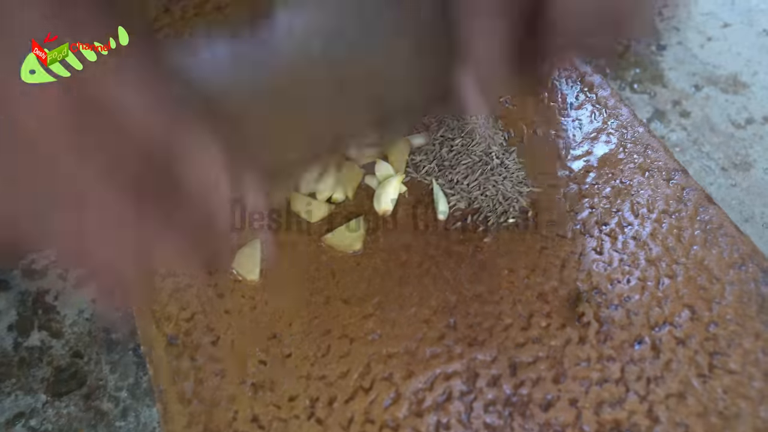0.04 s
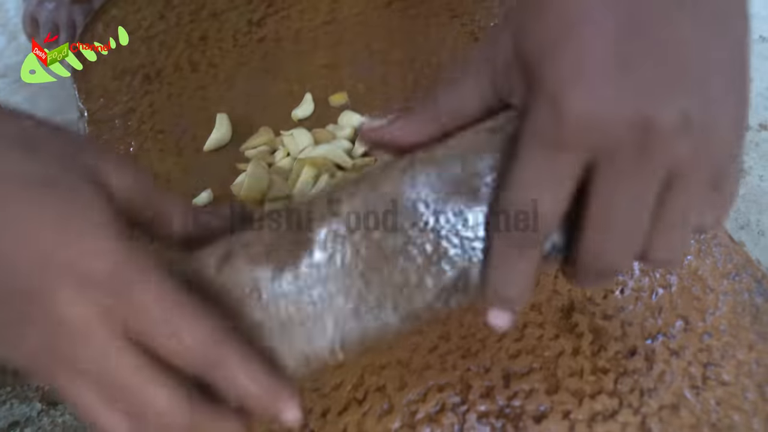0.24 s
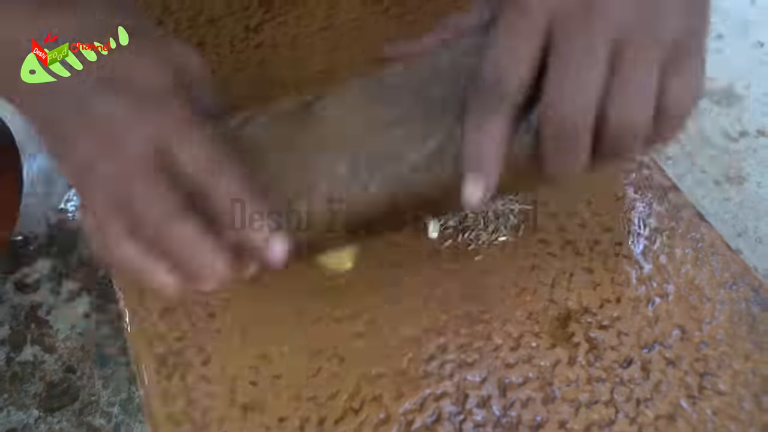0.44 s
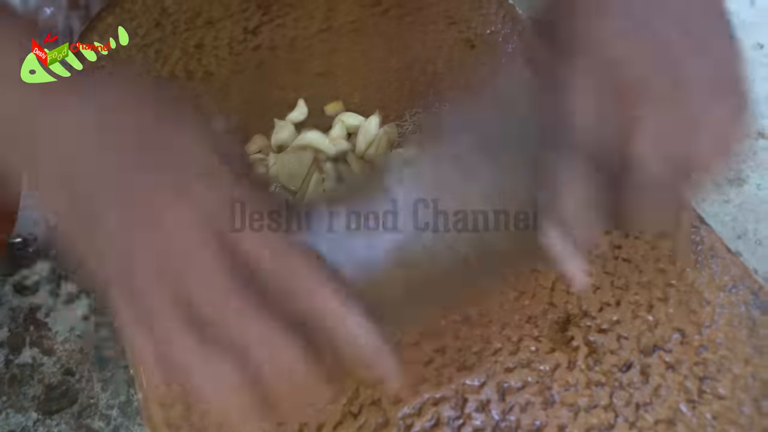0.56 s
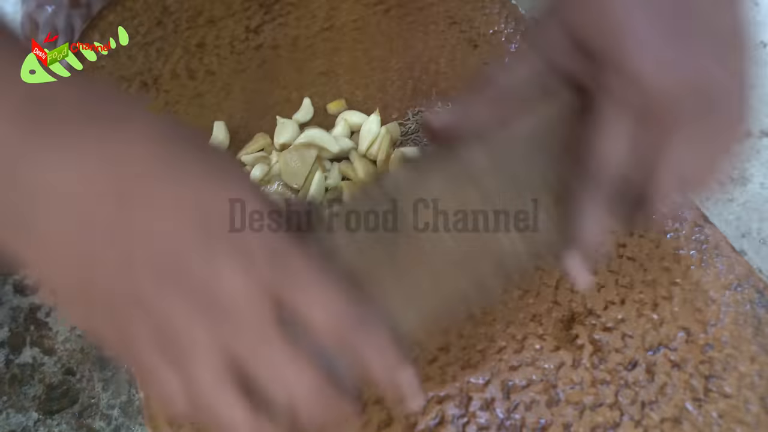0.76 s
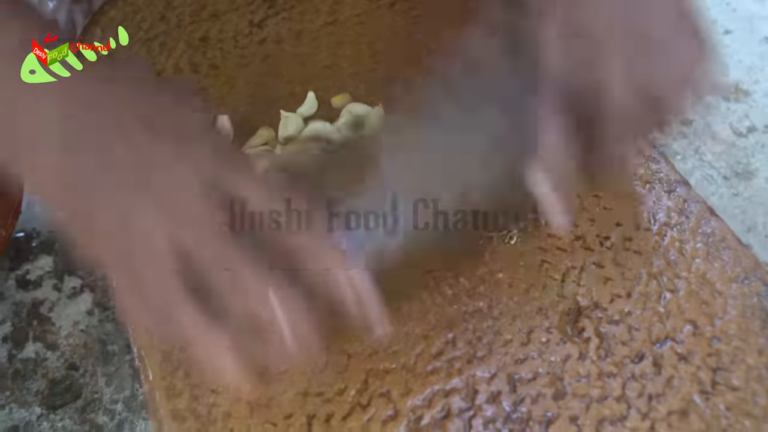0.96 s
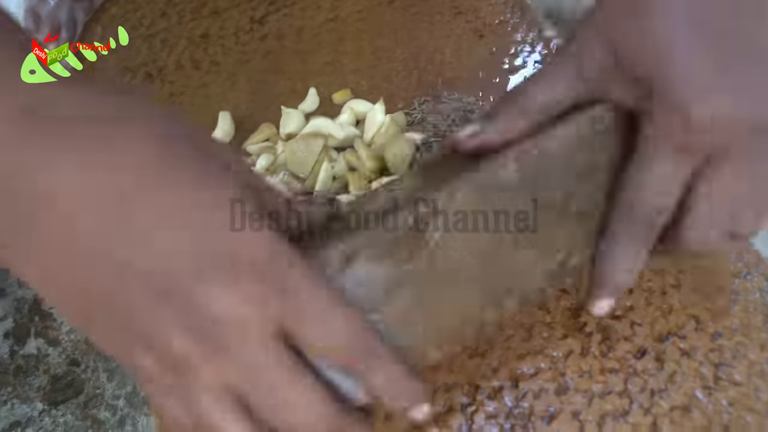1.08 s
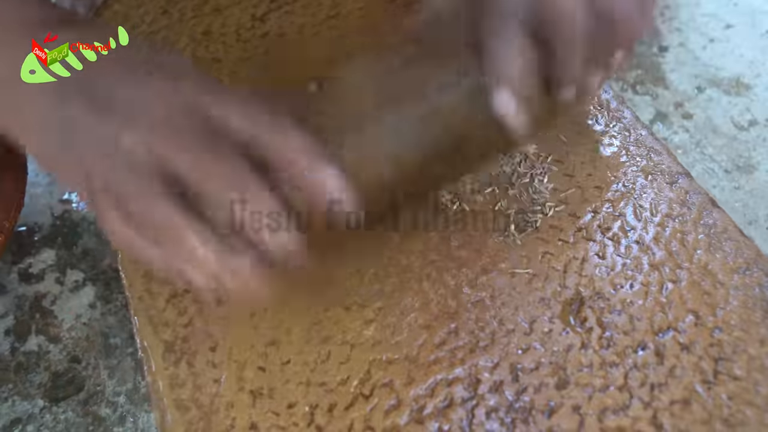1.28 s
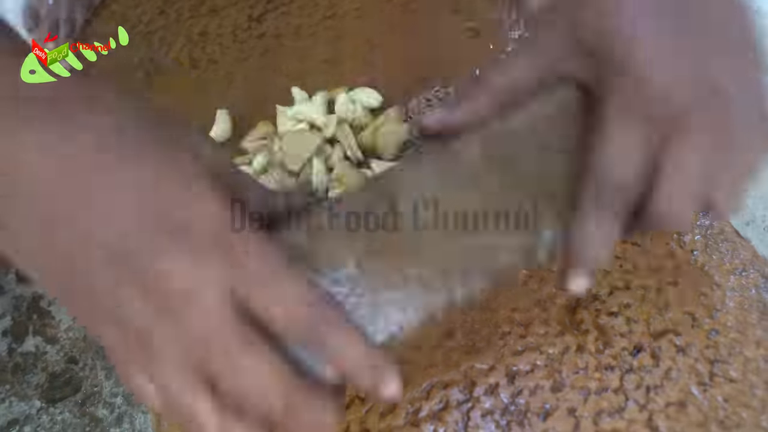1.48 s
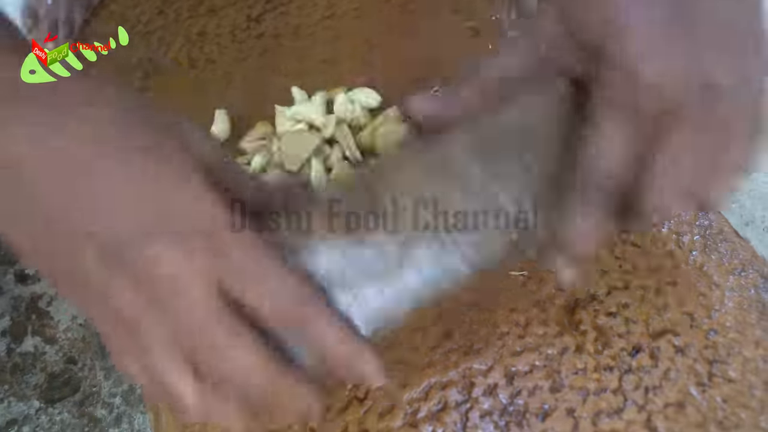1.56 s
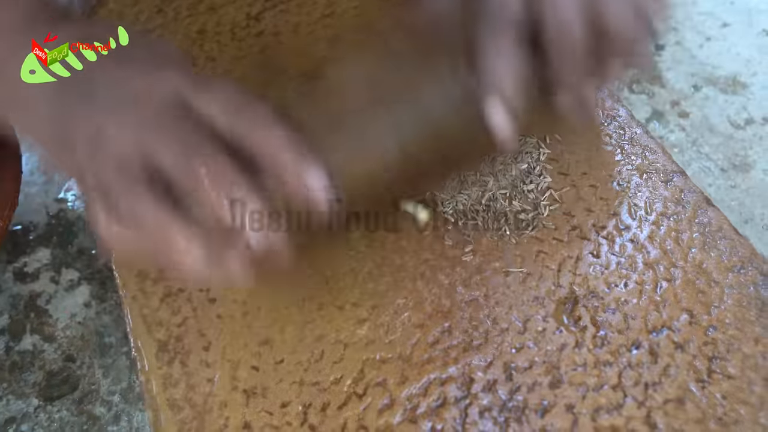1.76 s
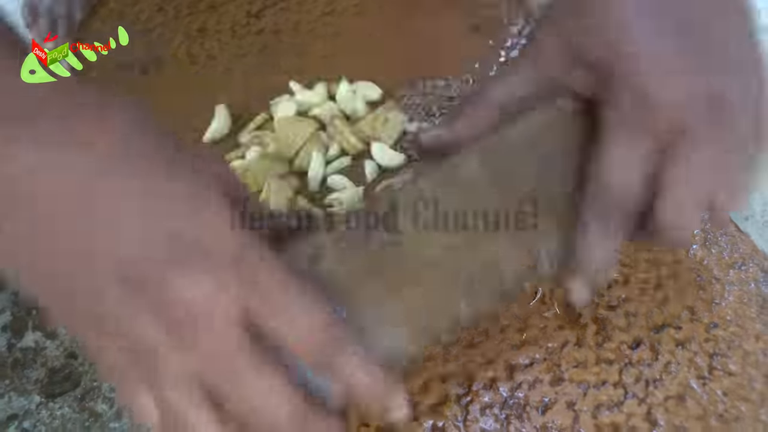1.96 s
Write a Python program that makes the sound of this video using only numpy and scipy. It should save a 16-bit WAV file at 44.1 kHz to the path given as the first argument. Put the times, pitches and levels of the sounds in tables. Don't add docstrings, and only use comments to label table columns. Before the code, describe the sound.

Stone grinding on stone: hard knocks, gritty rattles and crunching seeds in a quiet kitchen

```python
import sys
import numpy as np
from scipy import signal
from scipy.io import wavfile
from scipy.ndimage import uniform_filter1d

SR = 44100
rng = np.random.default_rng(int(sys.argv[2]) if len(sys.argv) > 2 else 0)


def store_wav(level_fs):
    pcm = np.round(np.clip(np.atleast_2d(level_fs), -1, 1) * 32767)
    wavfile.write(sys.argv[1], SR, pcm.T.astype(np.int16))


def voltage_ratio(decibels):
    exponent = np.asarray(decibels, float) / 20
    return 10 ** exponent


N = 89082

# pitch in Hz, level in dB, time to fall 60 dB in seconds,
# share that differs between left and right (0 to 1).
ROLLER_MODES = [(753, -5.5, 0.11, 0.062), (1059, 2, 0.044, 0.54), (1155.3, 3, 0.073, 0.6),
                (1345, 0.5, 0.04, 0.53), (1540, 0.5, 0.028, 0.46), (1780, -3.5, 0.021, 0.39),
                (2126, -11.5, 0.014, 0.32), (2742, -17.5, 0.046, 0.46), (4210, -24, 0.034, 0.36),
                (5910, -29, 0.016, .4)]
# pitch in Hz, level in dB, time to fall 60 dB in seconds.
THUD_MODES = [(81, -2, 0.116), (123.2, 8.5, 0.13), (186.2, 10.5, 0.099), (292, 21, 0.024)]
# pitch in Hz, level in dB, time to fall 60 dB in seconds,
# share that differs between left and right (0 to 1).
BENDING_MODES = [(341.4, -11, 0.056, 0.28), (464, -10, 0.037, 0.032), (542, -14, 0.01, 0.44),
                 (684.2, 3, 0.044, 0.13), (946, -7.5, 0.081, 0.18), (1380, -22, 0.022, 0.075),
                 (1590, -14.5, 0.03, 0.26)]
THUD_MODES_CENTRED = [(*mode, 0) for mode in THUD_MODES]

ROLLER_SIDES = voltage_ratio([[-0.5], [0.5]])
HISS_SIDES = voltage_ratio([[-1.5], [1.5]])
PATCHY_DB = 2.2


def rms_one(x):
    return x / np.sqrt(np.mean(x ** 2) + 1e-20)


def low(x, hz):
    return signal.sosfilt(signal.butter(2, min(hz, 0.45 * SR), fs=SR, output="sos"), x)


def band(x, low_hz, high_hz):
    return signal.sosfilt(signal.butter(2, [low_hz, high_hz], "band", fs=SR, output="sos"), x)


def passes(tables, column):
    t = np.arange(N) / SR
    total = np.zeros(N)
    for rows in tables:
        times = [row[0] for row in rows]
        levels = [row[column] for row in rows]
        total += voltage_ratio(np.interp(t, times, levels, -150, -150))
    return total


def at_hz(points, hz):
    table = np.array(points)
    return np.interp(np.log(hz), np.log(table[:, 0]), table[:, 1])


def grains(rate, spread_db):
    present = rng.random(N) < rate / SR
    size = voltage_ratio(spread_db * np.minimum(rng.exponential(1, N), 4))
    return present * size * rng.choice([-1, 1], N)


def ring(clicks, hz, t60):
    decay = voltage_ratio(-60 / (t60 * SR))
    turn = 2 * np.pi * hz / SR
    return signal.lfilter([0, np.sin(turn)], [1, -2 * decay * np.cos(turn), decay ** 2], clicks + 1e-18)


def spread(sound, late, share):
    return sound + share * late * [[1], [-1]]


def struck(modes, luck_db, length, t):
    total = 0
    for k, ((hz, db, t60, share), extra_db) in enumerate(zip(modes, luck_db)):
        fade = voltage_ratio(db + extra_db - 60 * t / (t60 * max(length, 0.1)))
        turn = 2 * np.pi * hz * t
        total = total + (-1) ** k * fade * spread(np.sin(turn), np.cos(turn), share)
    return total / abs(total).max()


def flicker():
    hz = 55
    knots = rng.standard_normal(int(N / SR * hz) + 2)
    return np.interp(np.arange(N) / SR * hz, np.arange(len(knots)), knots)


def banded(spectrum, sources, patchy_db):
    # pitch in Hz, likeness (1 is the same on both sides).
    likeness = [(100, 1), (500, 0.58), (1200, 0.53), (3000, 0.045), (8000, 0.33), (15000, 0.037)]
    edges = 30 * 2 ** np.arange(0, 9.6, 0.5)
    total = 0
    for k, (low_hz, high_hz) in enumerate(zip(edges, edges[1:])):
        mid, side = band(sources[k % 2], low_hz, min(high_hz, 0.45 * SR))
        hz = np.sqrt(low_hz * high_hz)
        alike = np.clip(at_hz(likeness, hz), -1, 1)
        stereo = np.sqrt(1 + alike) * mid + np.sqrt(1 - alike) * side * [[1], [-1]]
        total = total + voltage_ratio(at_hz(spectrum, hz) + patchy_db * flicker()) * stereo
    return rms_one(total)


def bending_wave(t):
    falling_hz = 234.4 + (1114 - 234.4) * np.exp(-t / 0.002)
    swing = np.sin(2 * np.pi * np.cumsum(falling_hz) / SR)
    return swing * voltage_ratio(-60 * t / 0.025) * (1 - np.exp(-t / 0.0018))


def knocks():
    # start in seconds, slab peak in dB, roller ring in dB over the slab,
    # ring length (1 is full), thud in dB over the slab.
    knock_rows = [(.249, -8, 11.5, 0.86, -9.5), (0.265, -31, 5, 1, 15), (0.304, -21, 14, 0.36, 9),
                  (.62, -11.5, 9.5, 0.93, -1), (0.7, -35.5, 2.5, 1, -2), (0.8642, 0, -11, 0.8, -6),
                  (.918, -6, -12.5, 0.72, 0.5), (0.932, -18.5, -25, 0.66, 5), (1.021, -8.5, 8.5, 1, -18),
                  (1.049, 7, -16.5, 0.62, -6), (1.092, -31.5, -19, 1, 8), (1.237, 2, -6.5, 0.99, -8),
                  (1.273, -6.5, -15, 0.86, -0.5), (1.289, -11.5, -32, 0.59, -3.5),
                  (1.448, -11, 10.5, 0.98, 0), (1.476, 5.5, -8.5, 0.77, -6), (1.758, 1.5, -9.5, 1, -11),
                  (1.8996, 2.5, -16.5, 0.53, -5.5), (1.912, -5.5, 2.5, 0.78, -2.5)]
    out = np.zeros((2, N + SR))
    t = np.arange(SR // 6) / SR
    luck = rng.normal(0, 1.2, (len(knock_rows), 24))
    chatter = 0.015 * rng.standard_normal((len(knock_rows), 400)) * np.exp(-t[:400] / 0.001)
    chatter[:, 0] = 1
    wave = voltage_ratio(-1) * bending_wave(t)
    octaves_up = np.log2(np.maximum([mode[0] / 1400 for mode in ROLLER_MODES], 1))
    for (start, db, roller_db, length, thud_db), lot, touch in zip(knock_rows, luck, chatter):
        slab = struck(BENDING_MODES, lot, length, t) * (1 - np.exp(-t / 0.00035))
        slab = low(low(slab + wave, 1540), 2140)
        hard_db = np.minimum(0.94 * (roller_db - 9.5), 3) * octaves_up
        roller = struck(ROLLER_MODES, lot[8:18] + hard_db, length, t)
        roller = low(roller, 5000 * voltage_ratio(min(roller_db, 6) * 0.5))
        body = slab + voltage_ratio(roller_db) * ROLLER_SIDES * roller
        body = signal.fftconvolve(body, touch[None], axes=1)[:, :len(t)] / np.sqrt(np.sum(touch ** 2))
        thud = struck(THUD_MODES_CENTRED, lot[19:], length, t) * (1 - np.exp(-t / 0.0037))
        i = int(start * SR)
        out[:, i:i + len(t)] += voltage_ratio(db) * (body + voltage_ratio(thud_db) * thud)
    return out[:, :N]


def rung(push, modes):
    total = 0
    for k, (hz, db, t60, share) in enumerate(modes):
        tone = voltage_ratio(db) * ring(push, hz, t60 * 0.53)
        late = np.gradient(tone) * SR / (2 * np.pi * hz)
        total = total + (-1) ** k * spread(tone, late, share)
    return rms_one(total)


def rattle():
    # time in seconds, level in dB, brightness in dB.
    roll_passes = [
        [(.305, -24, 8), (.345, -33, 17.5), (.362, -36, 13), (.38, -30.5, 10.5), (.397, -35.5, 15),
         (.41, -48, -8)],
        [(.525, -59, 37.5), (.55, -60, 39), (.6, -56, 25)],
        [(.74, -40.5, -1), (.795, -35, 14), (.813, -26.5, 4), (.86, -48, -5)],
        [(1.07, -39.5, -14), (1.195, -52, -14), (1.211, -26.5, 4), (1.237, -36.5, -8)],
        [(1.5, -38.5, -8), (1.565, -42, 13), (1.612, -30, 12), (1.635, -37, 15.5), (1.65, -40, 17),
         (1.662, -31, 8), (1.68, -80, -7)],
        [(1.98, -48, -14), (2.02, -40.5, -5)],
    ]
    gain = passes(roll_passes, 1)
    pits = grains(4000, 2.5) * gain
    bright = np.diff(pits * passes(roll_passes, 2), prepend=0)
    rasp_modes = [(1950, 8.5, 0.0066, 0.67), (3240, 6.5, 0.0012, 0.67), (4700, -13.0, 0.014, 0.45)]
    roller = rung(pits, ROLLER_MODES[:7]) * ROLLER_SIDES
    high = rung(bright, ROLLER_MODES[7:]) + voltage_ratio(-1.5) * rung(bright, rasp_modes)
    slab = rung(pits, [*BENDING_MODES, (730, -1.5, 0.13, 0.048)])
    thud = rung(pits, THUD_MODES_CENTRED)
    mix = roller + voltage_ratio(-9) * high + slab + voltage_ratio(-11.5) * thud
    return mix * np.sqrt(np.mean(gain ** 2))


def catches():
    # time of the peak in seconds, pitch in Hz, level in dB, build-up in seconds,
    # time to fall 60 dB in seconds.
    catch_rows = [(.254, 1160, -12.5, 0.0025, 0.087), (.2645, 4250, -36, 0.0016, 0.02),
                  (.279, 4200, -42, 0.0017, 0.024), (.867, 620, -12.5, 0.00093, 0.069),
                  (1.052, 670, -12, 0.0014, 0.057), (1.241, 730, -17, 0.0046, 0.053),
                  (1.761, 720, -10, .002, 0.062), (1.51, 717, -34.5, .015, .06),
                  (1.59, 427, -35, 0.0091, 0.14), (0.323, 178, -32, 0.018, 0.036),
                  (0.32, 2660, -35, 0.0054, .03), (0.34, 195, -23, 0.022, 0.048),
                  (0.329, 4105, -33.5, 0.0094, 0.035), (.361, 1154, -21.5, 0.0086, 0.097),
                  (0.361, 4243, -30, 0.0071, .04), (0.36, 2560, -33.5, .006, 0.036),
                  (0.38, 4204, -32.5, 0.0072, 0.072), (0.395, 360, -26.5, 0.01, 0.043),
                  (.397, 720, -25.5, .006, 0.029), (.397, 1120, -26.5, 0.0074, 0.054),
                  (0.64, 355, -47, 0.0054, 0.034), (.61, 6050, -37, 0.011, 0.034),
                  (.705, 400, -38, 0.0038, 0.036), (0.81, 1130, -24.5, 0.0033, 0.051),
                  (.812, 770, -27, 0.0069, 0.085), (0.812, 361, -28.5, 0.009, 0.11),
                  (1.58, 1160, -40, 0.0043, 0.056), (1.588, 2784, -34.5, 0.0069, 0.037),
                  (1.613, 1164, -24.5, 0.015, 0.019), (1.629, 1148, -20.5, 0.0039, 0.061),
                  (1.639, 693.5, -21.5, .014, 0.084), (1.657, 1190, -21.5, .005, 0.046),
                  (1.663, 710, -28, .008, 0.035), (1.64, 202, -36.5, 0.014, 0.17),
                  (1.8, 755, -32, 0.011, .1), (1.83, 706, -38, 0.017, 0.077)]
    roughness = 0.25
    out = np.zeros((2, N))
    t = np.arange(N) / SR
    for peak, hz, db, build, t60 in catch_rows:
        part = slice(int((peak - 0.06) * SR), int((peak + 0.15) * SR))
        u = t[part] - peak
        shake = low(rng.standard_normal((2, SR // 4)), 60 + hz / 12)[:, -len(u):]
        rise = np.exp(-(u / max(build, 0.002)) ** 2)
        swell = np.where(u < 0, rise, voltage_ratio(-60 * u / max(t60, 0.01)))
        rough = 1 + roughness * rms_one(shake[0]) + 2j * roughness * rms_one(shake[1])
        tone = swell * rough * np.exp(2j * np.pi * hz * u)
        share = 0.55 if hz > 900 else 0.1
        out[:, part] += voltage_ratio(db) * spread(tone.imag, tone.real, share) * ROLLER_SIDES
    return out


def crush():
    # time in seconds, hiss in dB, slab rumble in dB.
    crush_passes = [
        [(.31, -58, -43), (.4, -55.5, -52.5), (.5, -56, -55), (.54, -51, -43.5), (.58, -45.5, -34),
         (.62, -42, -28.5)],
        [(.66, -58, -37), (.74, -68, -50), (.82, -55, -29.5), (.86, -56, -44)],
        [(.95, -56, -57), (.975, -45, -44.5), (1.025, -43, -32)],
        [(1.2, -69, -35), (1.23, -48, -40), (1.3, -47, -28), (1.345, -64, -50), (1.39, -46, -47.5),
         (1.45, -43, -38.5)],
        [(1.56, -75, -38), (1.67, -53.5, -71), (1.755, -57, -40)],
        [(1.775, -62, -40), (1.82, -44.5, -38), (1.845, -38.5, -43), (1.88, -50, -32.5), (1.9, -54, -37.5)],
    ]
    # pitch in Hz, level in dB per Hz.
    hiss_colour = [(180, -31), (300, -22.5), (713, -15), (856, -19), (1080, -6.5), (2360, -12),
                   (2840, -4.5), (14200, -16.5), (16000, -26)]
    seeds = np.array([grains(7000, 3.5) for _ in range(4)]).reshape(2, 2, N)
    hiss = banded(hiss_colour, seeds, PATCHY_DB) * HISS_SIDES
    push = rng.standard_normal(N)
    rumble = rms_one(sum(voltage_ratio(db) * ring(push, hz, t60 * 0.52) for hz, db, t60 in THUD_MODES[1:]))
    return voltage_ratio(8.5) * passes(crush_passes, 1) * hiss + low(passes(crush_passes, 2) * rumble, 390)


def cracks():
    # start in seconds, peak in dB, pitch in Hz, time to fall 60 dB in seconds,
    # wide spray in dB.
    crack_rows = [
        (0.2483, -31, 4060, .03, -20),
        (0.304, -28, 4200, .03, -3),
        (0.4471, -22.5, 6300, 0.025, 5),
        (0.536, -26, 2700, .06, -7),
        (.543, -18.5, 2930, 0.17, 1),
        (0.9753, -17.5, 3860, 0.033, -1.5),
        (1.2256, -27, 3050, .03, -7),
        (1.519, -41, 6740, .02, -16),
        (1.7197, -11.5, 3370, 0.035, 12.5),
        (1.8153, -2.5, 3275, 0.022, -18),
    ]
    snap = 3.5
    octaves = 0.29
    out = np.zeros((2, N + SR))
    t = np.arange(SR // 10) / SR
    bursts = rng.standard_normal((len(crack_rows), 3, len(t)))
    for (start, db, hz, t60, wide_db), burst in zip(crack_rows, bursts):
        pair = burst[0] + 0.5 * burst[1:]
        pair = pair * voltage_ratio(-60 * t / max(t60, 0.008)) * (1 + snap * np.exp(-t / 0.0012))
        pair[:, 0] = 2 * (1 + snap)
        pitched = rms_one(band(pair, hz / 2 ** octaves, hz * 2 ** octaves))
        spray = rms_one(band(pair, 2560, 8460))
        crack = pitched + voltage_ratio(wide_db) * spray
        i = int(start * SR)
        out[:, i:i + len(t)] += voltage_ratio(db) * HISS_SIDES * crack / abs(crack).max()
    return out[:, :N]


def squeak():
    start, end = 0.471, 0.499
    from_hz, to_hz = 1000, 1480
    u = np.clip((np.arange(N) / SR - start) / (end - start), 0, 1)
    turn = 2 * np.pi * np.cumsum(from_hz + (to_hz - from_hz) * u) / SR
    rough = 1 + 0.45 * rms_one(low(rng.standard_normal(N), 300))
    tone = np.sin(turn) + 0.2 * rough * np.sin(2 * turn)
    return voltage_ratio(-35.5) * rough * np.sin(np.pi * u) * tone


def kitchen_echoes(stone):
    # delay in seconds, level in dB.
    echo_rows = [
        (.011, -19),
        (.019, -35),
        (.031, -38),
    ]
    total = 0
    for k, (delay, db) in enumerate(echo_rows):
        sign = (-1) ** k
        late = np.pad(stone[::sign], ((0, 0), (int(delay * SR), 0)))[:, :N]
        total = total + sign * voltage_ratio(db) * late
    return low(total, 2700)


def room_tone():
    # pitch in Hz, level in dB per Hz.
    hush_colour = [(18, -54), (30, -12), (90, 4), (404, -5), (1720, -7), (2350, -3.5), (2750, -16),
                   (3060, -7.5), (16000, -22.5)]
    return voltage_ratio(-45.5) * banded(hush_colour, rng.standard_normal((2, 2, N)), PATCHY_DB / 2)


def scene():
    stone = knocks() + rattle() + catches() + cracks() + squeak()
    return stone + kitchen_echoes(stone) + crush() + room_tone()


def top_cut(x):
    return signal.sosfilt(signal.butter(12, 16640, fs=SR, output="sos"), x)


def record(dry):
    duck_from_db, duck_slope, release_db_per_s = -17.5, 0.51, 65
    ceiling = 0.8
    dry = signal.sosfilt(signal.butter(4, 69.5, "high", fs=SR, output="sos"), dry)
    level = 10 * np.log10(uniform_filter1d(np.mean(dry ** 2, axis=0), size=220) + 1e-12)
    release = release_db_per_s * np.arange(N) / SR
    over = np.maximum(level - duck_from_db, 0) * duck_slope
    duck = uniform_filter1d(np.maximum.accumulate(over + release) - release, size=88)
    mix = ceiling * np.tanh(dry * voltage_ratio(-duck) / ceiling)
    return top_cut(mix)


dry = scene()
out = record(dry)
store_wav(out)
```